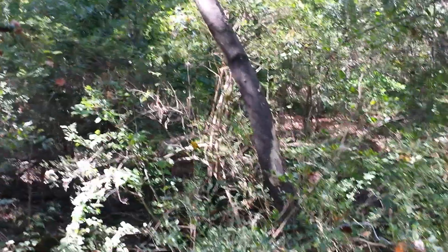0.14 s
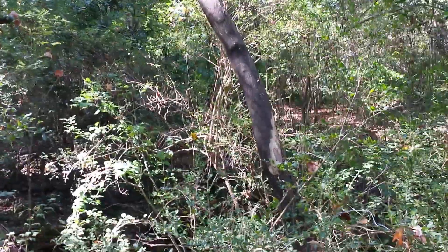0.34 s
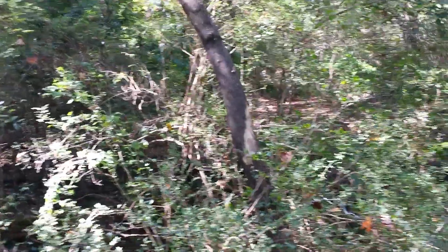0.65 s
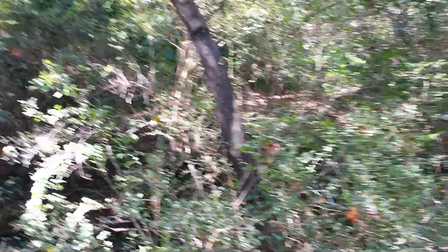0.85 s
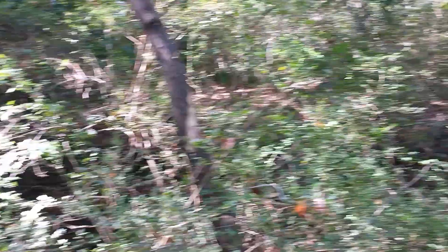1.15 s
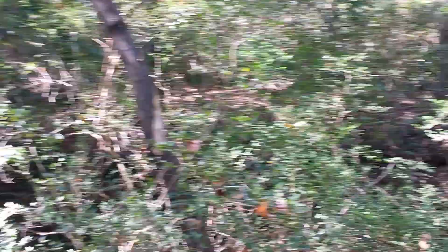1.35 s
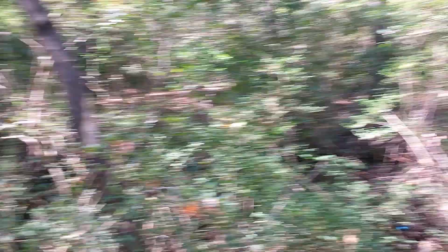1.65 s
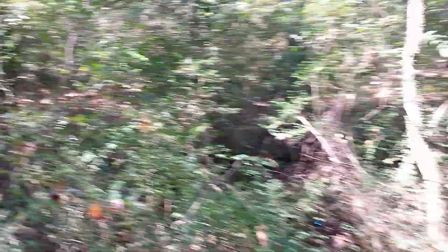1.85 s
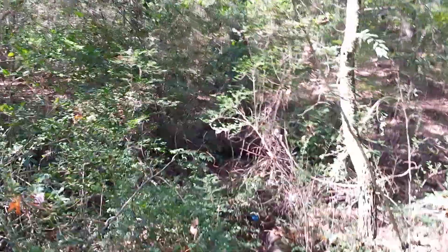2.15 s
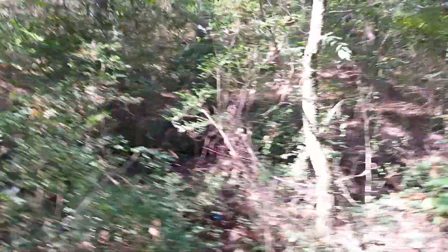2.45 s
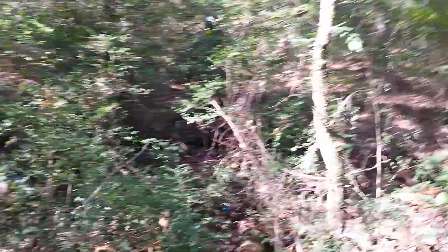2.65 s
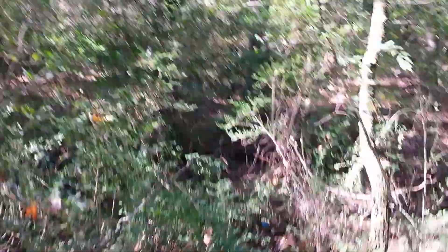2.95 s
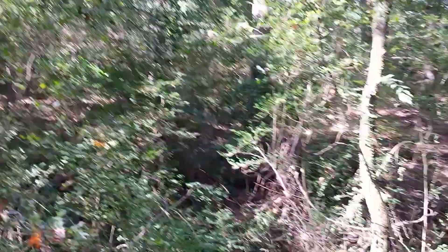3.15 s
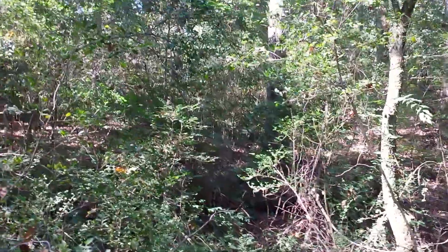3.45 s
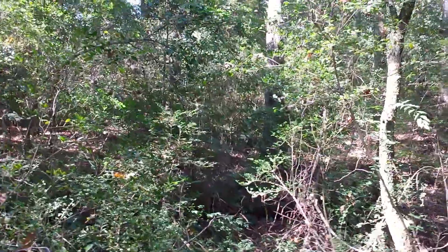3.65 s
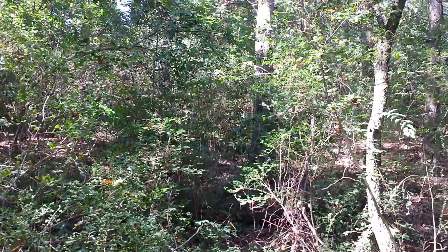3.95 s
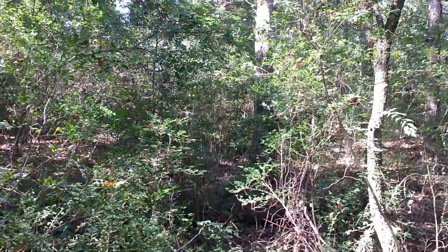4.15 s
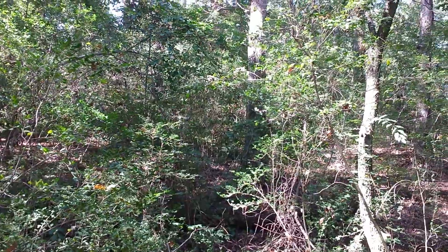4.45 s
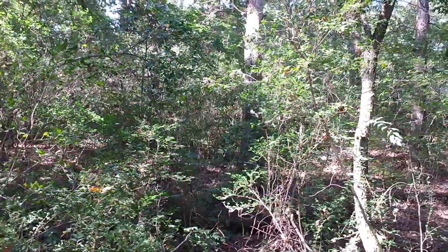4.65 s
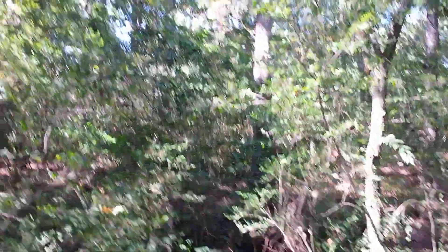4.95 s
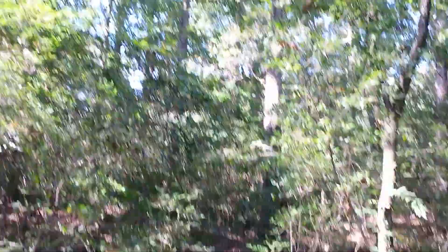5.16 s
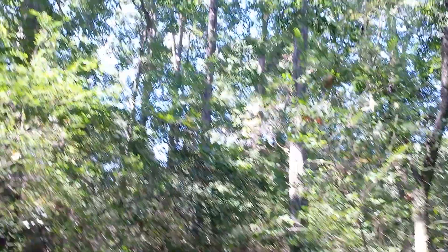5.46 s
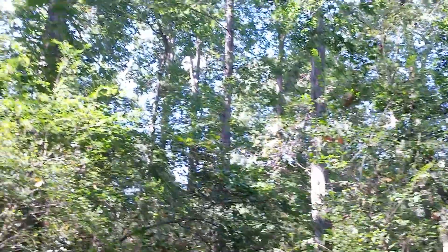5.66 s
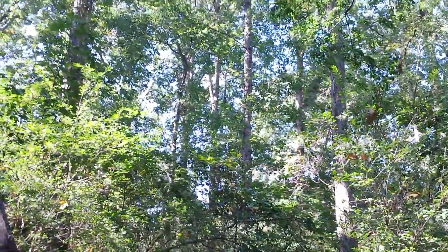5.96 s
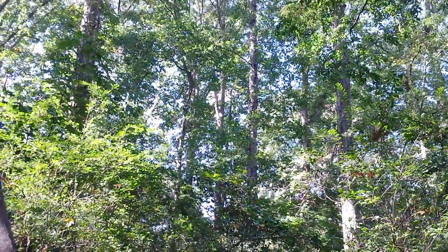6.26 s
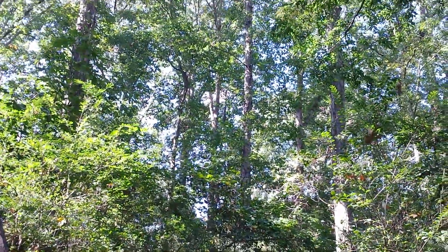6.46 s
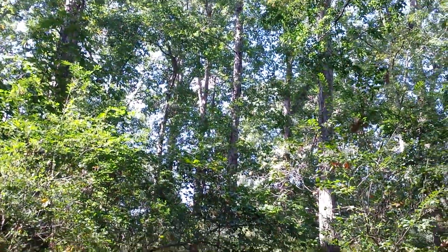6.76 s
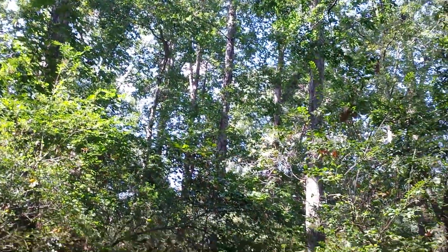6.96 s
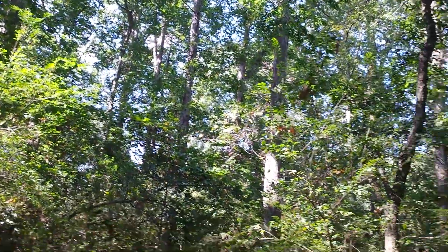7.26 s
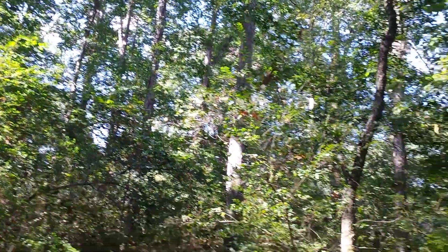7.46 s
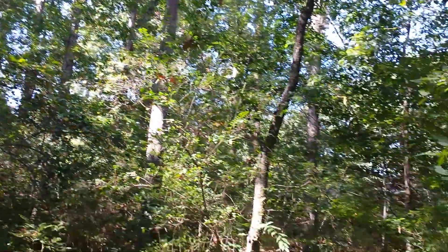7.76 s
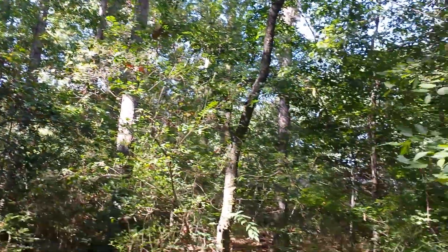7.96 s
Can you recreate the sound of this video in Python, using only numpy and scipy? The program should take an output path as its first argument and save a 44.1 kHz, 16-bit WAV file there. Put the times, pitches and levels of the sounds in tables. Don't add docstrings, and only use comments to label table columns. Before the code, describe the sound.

A steady, shrill cricket chorus around 7 kHz runs throughout, heard in stereo in an echoing wood. Three nearer crickets pulse about fifteen times a second; the closest leans left and grows loudest around 2.2 to 2.8 s, while another drifts from far left towards the centre. A faint higher trill and a thin buzz on the left blend in, with soft air and microphone hiss. Distant traffic rumbles low, swelling near 1.8 s and more broadly from 6.5 to 7.7 s. A faint knock at 0.6 s and a leaf rustle at 0.9 s precede dull knocks and crisp left-side ticks at 1.5 to 1.8 s. Dry brushes and taps follow at 2.3 to 3.1 s, with a soft low bump on the right near 2.8 s, then a bright knock and rustle at 3.5 s. A sharp twig snap cracks on the right at 5.5 s. At 6.5 s one brief, hoarse, falling bird chip sounds left with a soft rustle; a faint leaf tap comes at 7.9 s.

```python
import sys
import numpy as np
from scipy import signal
from scipy.fft import rfft, irfft
from scipy.io import wavfile
from scipy.ndimage import uniform_filter1d

SR = 44100
rng = np.random.default_rng(int(sys.argv[2]) if len(sys.argv) > 2 else 0)


def pcm_store(signal):
    levels = np.round(np.clip(np.atleast_2d(signal), -1, 1) * 32767)
    wavfile.write(sys.argv[1], SR, levels.astype(np.int16).T)


def gain_from_db(level_db):
    decades = np.asarray(level_db, float) / 20
    return 10 ** decades


N = 357651
T = np.arange(N) / SR


def evened(x):
    return x / np.sqrt(np.mean(x ** 2) + 1e-20)


def read(points, hz):
    f, *columns = np.transpose(points)
    return np.array([np.interp(np.log(hz + 1), np.log(f + 1), c) for c in columns])


def follow(rows):
    s, *columns = np.transpose(rows)
    return [np.interp(T, s, c) for c in columns]


def sides(pan_db):
    return gain_from_db(np.array([pan_db / 2, -pan_db / 2]))


def wander(per_s):
    knots = rng.standard_normal(int(T[-1] * 60) + 9)
    return evened(np.interp(T * np.minimum(per_s, 60), np.arange(len(knots)), knots))


def add(mix, at, sound):
    part = mix[..., at:at + sound.shape[-1]]
    part += sound[..., :part.shape[-1]]


def resonate(x, hz, width):
    turn = np.exp(2j * np.pi * hz * np.arange(x.shape[-1]) / SR)
    r = np.exp(-np.pi * width / SR)
    smooth = signal.lfilter([(1 - r) ** 2], [1, -2 * r, r * r], x / turn)
    return 2 * (turn * smooth).real


def hiss(gain, same, patchy_db):
    a, b, c, d, patches = rng.standard_normal((N // 256 + 5, 513, 5)).T
    patches = uniform_filter1d(patches, size=12, axis=0)
    patches = evened(uniform_filter1d(patches, size=14, axis=1))
    same = np.clip(same, -1, 1)[:, None]
    left = a + 1j * b
    right = same * left + np.sqrt(1 - same ** 2) * (c + 1j * d)
    z = np.array([left, right]) * gain[..., None] * gain_from_db(patchy_db * patches)
    return signal.istft(z, nperseg=1024, noverlap=768)[1][:, :N]


# (place in the stroke [0-1], pitch [share of the top], level [dB])
WING_STROKE = [(0, .97, -5), (.12, .983, -2), (.45, 1.0, 0), (.7, .991, -2), (.88, .968, -6),
               (1, .948, -12)]


def cricket(strokes, top_hz, ms, uneven_db):
    place = np.linspace(0, 1, int(ms * SR / 1000))
    u, share, db = np.transpose(WING_STROKE)
    fade = np.clip(np.minimum(place, 1 - place) / 0.053, 0, 1)
    size = gain_from_db(np.interp(place, u, db)) * fade
    angle = 2 * np.pi * np.cumsum(top_hz * np.interp(place, u, share)) / SR
    stroke_length = ms / 1000 * np.mean(np.diff(strokes)) * SR
    starts = np.flatnonzero(np.diff(np.floor(strokes + .45 * stroke_length)) > 0)
    song = np.zeros(N, complex)
    for at, (pitch, force, phase) in zip(starts, rng.standard_normal((600, 3))):
        tone = np.exp(1j * (angle * (1 + .002 * pitch) + 9 * phase))
        add(song, at, gain_from_db(uneven_db * force) * size * tone)
    return song


# (time [s], peak left [dB], peak right [dB])
NEAREST = [(0, -38.5, -43), (1, -40.5, -44.5), (1.75, -38, -44), (2.2, -30.5, -42), (2.75, -30, -42),
           (3.3, -34, -42.5), (4.3, -35, -41), (5.3, -35.5, -42.5), (6.2, -37, -42.5), (7.3, -35.5, -43),
           (8.11, -33.5, -41)]
SECOND_SINGER = [(0, -47, -47), (3.2, -48, -48), (4, -47, -44), (8.11, -48, -46)]
THIRD_SINGER = [(0, -41, -60), (4, -41.5, -52), (8.11, -50.5, -45)]
# (time [s], lead of its beat [strokes])
NEAREST_LEAD = [(0, -.56), (2.5, -.51), (4.5, -.47), (5.8, -.52), (8.11, -.7)]
SECOND_SINGER_LEAD = [(0, -.5), (2, -.5), (4, -.64), (6.4, -.59), (8.11, -.47)]
THIRD_SINGER_LEAD = [(0, -.31), (8.11, -.26)]


def singer(rows, lead, per_s, top_hz, ms, boost_db):
    song = cricket(per_s * T + follow(lead)[0], top_hz, ms, uneven_db=0.44)
    right = song * np.exp(1j * (1.6 + 0.5 * wander(0.883)))
    flutter_db = 0.24 * np.array([wander(50), wander(46)])
    return gain_from_db(np.array(follow(rows)) + boost_db + flutter_db) * np.array([song, right]).real


# (time [s], level [dB], left-right [dB])
CHORUS_LEVEL = [(0, -45.5, 6), (2, -45, 3), (4, -46, 2), (6, -44, 6), (8.11, -48.5, 7)]
# (top pitch [Hz], spread [Hz], level [dB], left-right [dB])
CHORUS_CROWDS = [(7370, 90, -4, 2), (7150, 110, -2, -1), (6950, 140, -1.5, 0), (7620, 130, -10, -2),
                 (6760, 190, -10, 2)]


def chorus():
    out = np.zeros((2, N))
    for hz, spread, db, pan_db in CHORUS_CROWDS:
        for beat, start, pitch, size, side in rng.random((6, 5)):
            strokes = T * (13.5 + 3.5 * beat) + start
            song = cricket(strokes, hz + spread * (2 * pitch - 1), 24, uneven_db=3.0)
            gains = gain_from_db(db - 11.0 * size) * sides(pan_db + 12 * (side - .5))
            out += gains[:, None] * np.array([song.real, song.imag])
    level_db, pan_db = follow(CHORUS_LEVEL)
    return gain_from_db(level_db) * sides(pan_db) * evened(out)


# (time [s], level [dB], left-right [dB])
TRILL_LEVEL = [(0, -56, -7), (3, -56, -4), (5, -57, -4), (6.5, -61, 9.5), (8.11, -48, 0)]


def triller():
    level_db, pan_db = follow(TRILL_LEVEL)
    song = cricket(49.5 * T + 0.8 * wander(1.7), 7885, 11, uneven_db=3.5)
    pair = evened(np.array([song.real, song.imag]))
    return gain_from_db(level_db + 2.5 * wander(8.8)) * sides(pan_db) * pair


def buzz():
    clicks = rng.standard_normal((2, N)) * (1 + 0.23 * wander(25))
    level = gain_from_db(-59.5 + .7 * wander(1.7))
    return level * sides(11.6)[:, None] * evened(resonate(clicks, 5954, 760))


# (frequency [Hz], density [dB per Hz])
ROAR_SPECTRUM = [(12, -40), (20, -7), (55, -3), (97, 1), (129, 0.5), (167, -0.5), (290, -5.5), (326, -6.5),
                 (408, -12.5), (867, -20), (1200, -27.5), (1560, -38), (2640, -120)]
# (frequency [Hz], likeness [0-1])
ROAR_COHERENCE = [(60, 1), (200, 0.85), (450, 0.73), (800, 0.5), (1300, 0.072)]
# (frequency [Hz], width [Hz], level [dB])
ENGINE_DRONE = [(166.5, 19.8, 0), (330, 25, -12), (231.6, 58, -1.5), (90, 19, -5)]
# (closest time [s], half length [s], rumble [dB], engine drone [dB])
VEHICLES = [
    (0, 0.4, -49, -50.5),
    (1.81, 0.24, -42, -41),
    (5.395, 0.12, -68, -45.5),
    (6.583, 0.37, -42.5, -45),
    (7.09, 0.074, -55, -37.5),
    (7.293, 0.035, -47, -39.5),
    (7.2, 0.46, -42.5, -44.5),
    (7.722, 0.37, -47, -47),
]


def traffic():
    hz = np.fft.rfftfreq(1024, 1 / SR)
    s, half, rumble_db, drone_db = np.transpose(VEHICLES)[..., None]
    near = np.exp(-((T - s) / half) ** 2)
    swell = np.sqrt(gain_from_db(-48.5) ** 2 + (near * gain_from_db(rumble_db) ** 2).sum(0))
    engine = np.sqrt(gain_from_db(-61) ** 2 + (near * gain_from_db(drone_db) ** 2).sum(0))
    engine = engine * gain_from_db(2 * wander(6.7))
    roar = evened(hiss(gain_from_db(read(ROAR_SPECTRUM, hz)), read(ROAR_COHERENCE, hz)[0], patchy_db=0.7))
    low = resonate(roar, 214, 570)
    noise = rng.standard_normal(N)
    drone = evened(sum(gain_from_db(db) * evened(resonate(noise, f, w)) for f, w, db in ENGINE_DRONE))
    mix = gain_from_db(-46.5) * (roar - low) + gain_from_db(-2.0) * swell * low + gain_from_db(-3.0) * engine * drone
    return sides(2.7)[:, None] * mix


# (frequency [Hz], left [dB per Hz], right [dB per Hz])
AIR_SPECTRUM = [(302, -100, -101), (886, -87, -90), (1434, -94, -95.5), (2240, -100, -101),
                (2995, -101, -101), (3716, -96, -96.5), (4400, -96.5, -98), (6000, -92.5, -95),
                (6135, -84, -102), (7388, -70, -76.5), (8020, -92, -94), (8450, -106, -102),
                (11530, -105.5, -98), (13700, -104.5, -101.5)]


def air():
    hz = np.fft.rfftfreq(1024, 1 / SR)
    unit = evened(hiss(np.ones((1, 513)), 0 * hz, patchy_db=0.7))
    spectrum = gain_from_db(read(AIR_SPECTRUM, np.fft.rfftfreq(N, 1 / SR))) * np.sqrt(SR / 2)
    return irfft(rfft(unit) * spectrum, N)


# (frequency [Hz], 60 dB decay time [s])
WOOD_DECAY = [(1000, 1), (5000, 0.85), (9000, 0.93)]


def echo(x):
    taps = np.zeros((2, SR // 2))
    at = np.arange(200, SR // 2 - 20, 20) + rng.integers(0, 20, (2, (SR // 2 - 201) // 20))
    np.put_along_axis(taps, at, rng.choice([-1., 1.], at.shape), 1)
    hz, t, z = signal.stft(taps, SR, nperseg=256)
    tail = signal.istft(z * gain_from_db(-60 * t / read(WOOD_DECAY, hz).T), SR, nperseg=256)[1]
    tail = tail / np.linalg.norm(tail[0])
    return signal.oaconvolve(x * np.ones((2, 1)), tail, axes=1)[:, :N]


# (time [s], peak [dB], ring [Hz], left-right [dB])
WOOD_KNOCKS = [
    (0.562, -46.5, 727, 2.5),
    (1.543, -40, 700, 3.6),
    (1.544, -52, 2000, 3.6),
    (1.551, -43, 900, 3.6),
    (1.558, -54, 1900, 3.6),
    (2.602, -46.5, 725, 1.5),
    (2.723, -52, 1500, 3.7),
    (3.495, -39, 2400, 3.7),
]
TWIG_TICKS = [
    (1.542, -47, 5990, 9),
    (1.5544, -43, 5470, 8),
    (1.6249, -37, 5770, 15),
    (1.6881, -40, 5440, 12),
    (1.7604, -40, 5930, 9),
    (3.557, -46, 5960, 5),
]
LEAF_TAPS = [
    (2.6004, -50, 4400, 10),
    (3.0735, -48.5, 4375, -15),
    (3.7599, -54.5, 4420, 19),
    (5.4963, -54, 4400, -4),
    (7.8862, -48.5, 4400, -10),
]
HAND_BUMP = [
    (2.77, -47, 60, -11),
]
# (time [s], peak [dB], left-right [dB], dies in [ms])
LEAF_RUSTLES = [
    (0.8944, -41, 9, 26),
    (1.7644, -50, 12.5, 34),
    (2.2692, -41.5, 8, 40),
    (2.3984, -43, 10, 24),
    (2.4154, -40.5, 7, 36),
    (2.7227, -40.5, 11, 30),
    (3.0066, -53, 11, 27),
    (3.5553, -42, 4, 36),
    (6.482, -46, 10, 80),
]
# (ring [Hz], width [Hz], peak [dB], left-right [dB], dies in [ms])
TWIG_SNAP = [
    (4200, 1300, -27.5, -12, .4),
    (6800, 2600, -32.5, -7, .7),
    (2600, 1600, -53, -3, .6),
    (11300, 6000, -33, -6, .7),
]
# (frequency [Hz], gain [dB])
PORT_RESPONSE = [(2000, 2.5), (2900, -12.5), (3700, -1), (7800, 7.5), (8900, -12.5), (10800, 4),
                 (13000, -9), (14600, -9)]
# (width [Hz], dies in [ms])
TICK_RING, TAP_RING, KNOCK_RING, BUMP_RING = (1500, 1.1), (2400, 3.5), (700, 1.5), (40, 12)


def litter():
    out, t = np.zeros((2, N)), T[:6000]
    kinds = (TWIG_TICKS, TICK_RING), (LEAF_TAPS, TAP_RING), (WOOD_KNOCKS, KNOCK_RING), (HAND_BUMP, BUMP_RING)
    events = [row + ring for rows, ring in kinds for row in rows]
    events += [(5.4861, db, hz, pan_db, width, ms) for hz, width, db, pan_db, ms in TWIG_SNAP]
    events += [(s, db, 5720, pan_db, 4600, ms) for s, db, pan_db, ms in LEAF_RUSTLES]
    for s, db, hz, pan_db, width, ms in events:
        crackle = rng.standard_normal((2, len(t))) * gain_from_db(2.7 * rng.exponential(1, len(t)))
        crackle[:, 0] = 4.3
        crackle[1] = crackle[int(hz > 1000)]
        crackle *= np.exp(-t * 1000 / max(ms, .1))
        burst = resonate(crackle, hz, width) + 0.16 * resonate(crackle, 2.12 * hz, 1.9 * width)
        burst = burst / abs(burst).max(1, keepdims=True)
        add(out, round(s * SR), gain_from_db(db + 3.0) * sides(pan_db)[:, None] * burst)
    return irfft(rfft(out) * gain_from_db(read(PORT_RESPONSE, np.fft.rfftfreq(N, 1 / SR))), N)


# (time [s], pitch [Hz], level [dB])
BIRD_CHIP = [
    (6.478, 11800, -56),
    (6.484, 9200, -64),
    (6.491, 7600, -45),
    (6.497, 6400, -42),
    (6.502, 5400, -41),
    (6.507, 4750, -38),
    (6.509, 4400, -50),
    (6.514, 3500, -52),
]


def bird():
    hz, db = follow(BIRD_CHIP)
    gate = np.clip(np.minimum(T - BIRD_CHIP[0][0], BIRD_CHIP[-1][0] - T) / 0.0048, 0, 1)
    hoarse = 1 + .5 * evened(uniform_filter1d(rng.standard_normal(N), size=40))
    tone = np.sin(2 * np.pi * np.cumsum(hz) / SR)
    return sides(8.5)[:, None] * gate * hoarse * gain_from_db(db) * tone


def scene():
    near = singer(NEAREST, NEAREST_LEAD, 14.735, 7140, 24.5, boost_db=3.8)
    near += singer(SECOND_SINGER, SECOND_SINGER_LEAD, 14.6, 7385, 22, boost_db=6.0)
    near += singer(THIRD_SINGER, THIRD_SINGER_LEAD, 15.45, 7390, 23, boost_db=3.0)
    far, high, leaves, chip = chorus(), triller(), litter(), bird()
    wet = echo(gain_from_db(-12.5) * near + gain_from_db(0.0) * far + gain_from_db(-10.5) * high + gain_from_db(-15.0) * leaves + gain_from_db(-0.5) * chip)
    direct = near + gain_from_db(-8.5) * far + gain_from_db(-6.5) * high + leaves + chip
    return direct + wet + buzz() + traffic() + air()


def low_pass(x):
    return signal.sosfilt(signal.butter(12, 15610, fs=SR, output="sos"), x)


# (frequency [Hz], left [dB per Hz], right [dB per Hz])
AUDIBLE_FLOOR = [(1410, -106, -106), (2263, -102, -102), (2662, -96, -98.5), (2877, -91.5, -83),
                 (3256, -98.5, -97.5), (3645, -102, -102), (8200, -100, -100), (8440, -90.5, -94),
                 (9000, -90, -99), (9800, -94, -102), (10600, -100, -103), (11500, -103, -103.5),
                 (14530, -103, -103), (14700, -85, -85)]


def record(dry):
    cut = signal.lfilter(*signal.butter(2, 34, "high", fs=SR), dry)
    shape = dict(window="cosine", nperseg=2048, noverlap=1024, scaling="psd")
    hz, _, z = signal.stft(cut, SR, **shape)
    power = uniform_filter1d(2 * abs(z) ** 2, size=8, axis=1)[:, 3:1020:6]
    keep = power > gain_from_db(read(AUDIBLE_FLOOR, hz[3:1020:6]))[..., None] ** 2
    z[:, :1020] *= np.repeat(keep, 6, axis=1)
    mix = signal.istft(z, SR, **shape)[1][:, :N] - .0005
    return low_pass(mix)


dry = scene()
out = record(dry)
pcm_store(out)
```